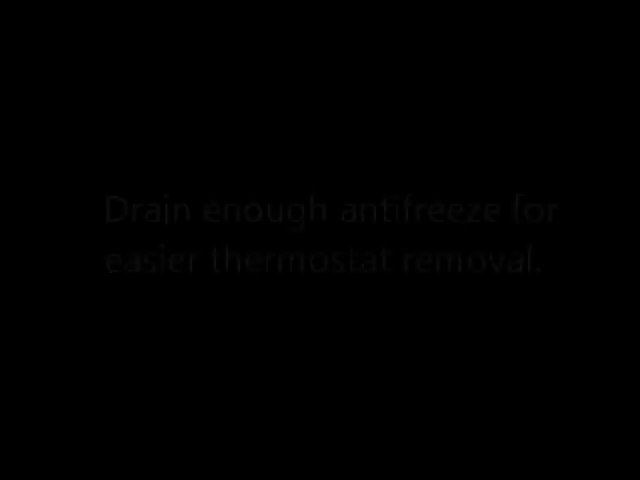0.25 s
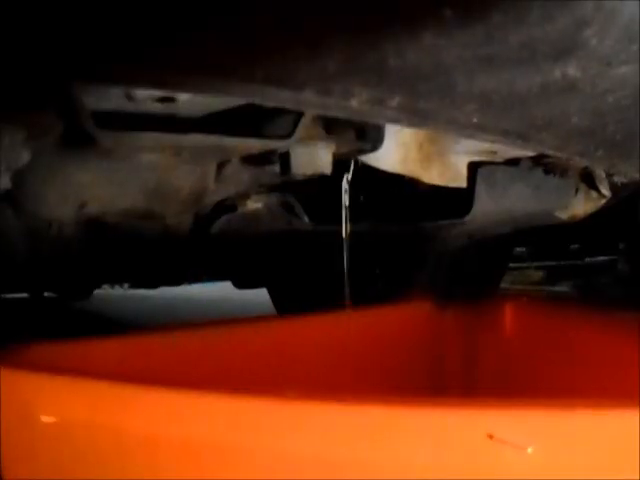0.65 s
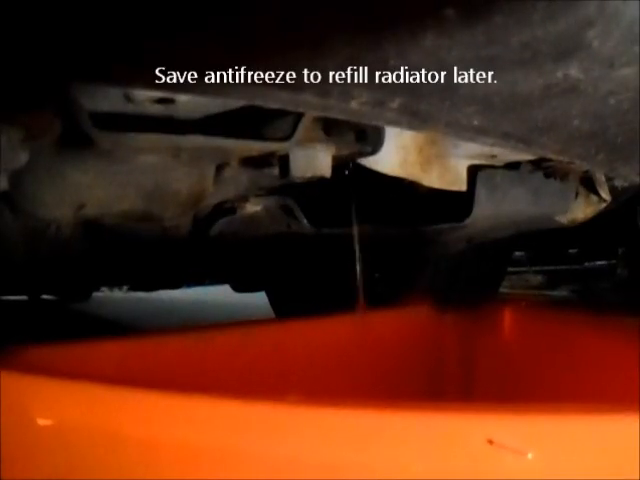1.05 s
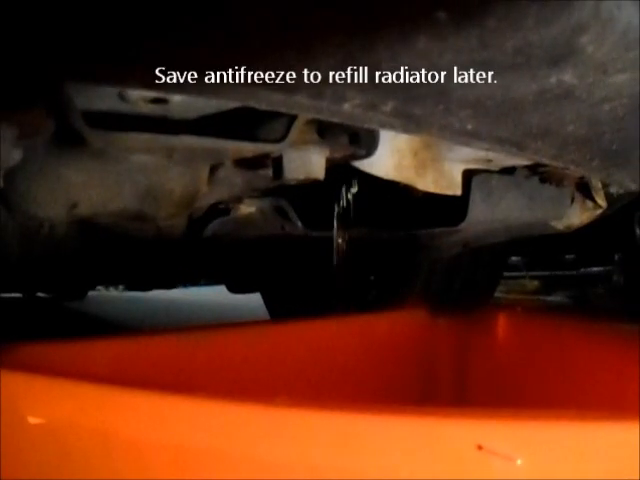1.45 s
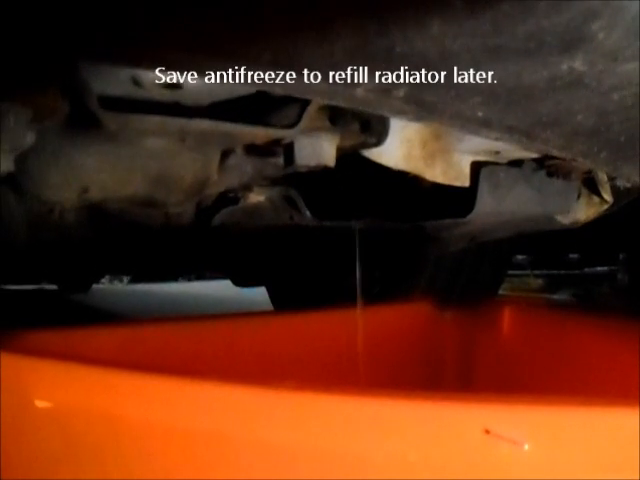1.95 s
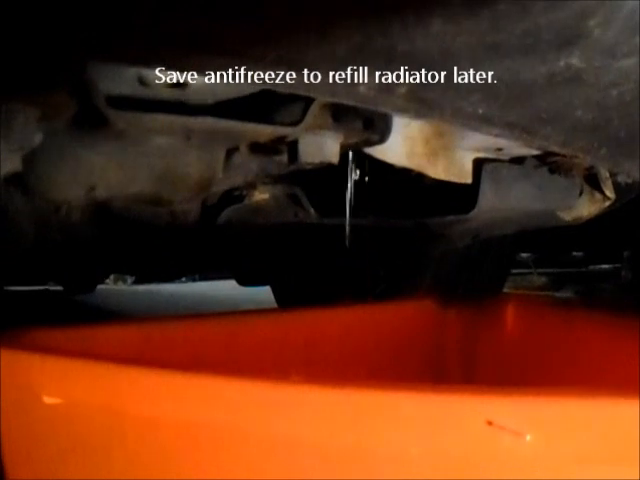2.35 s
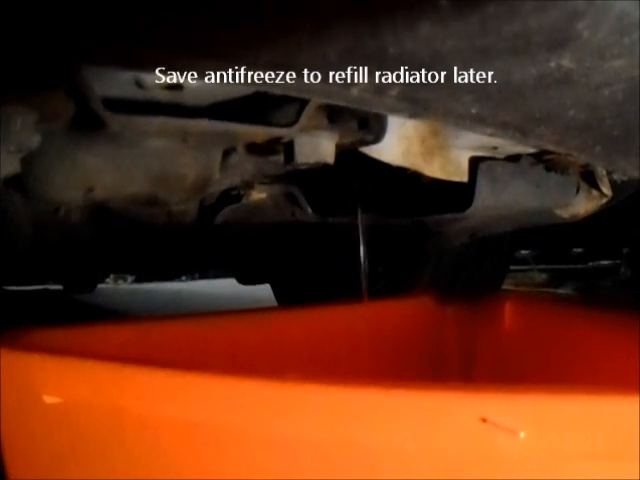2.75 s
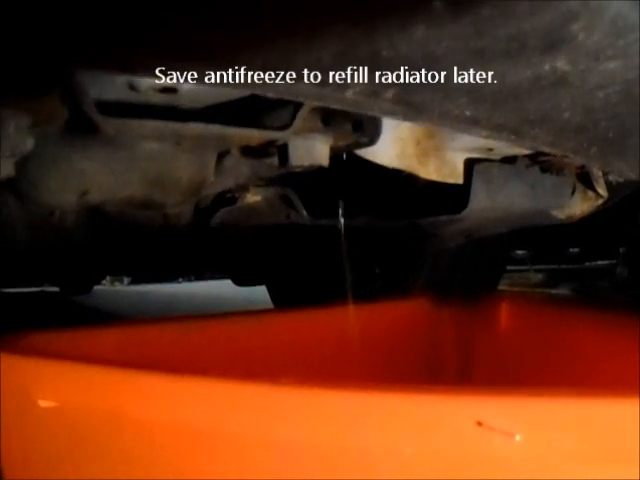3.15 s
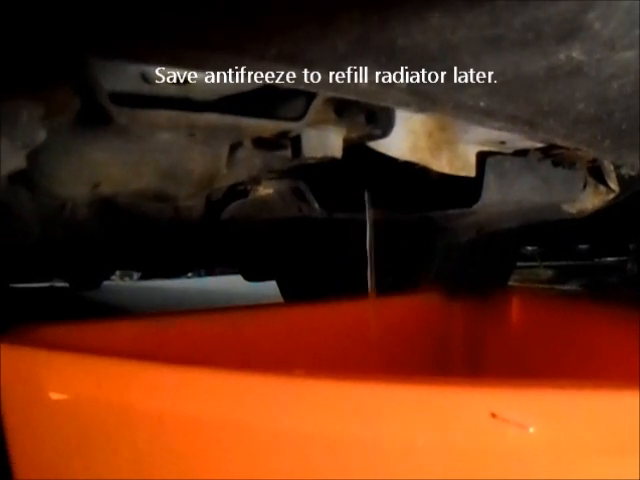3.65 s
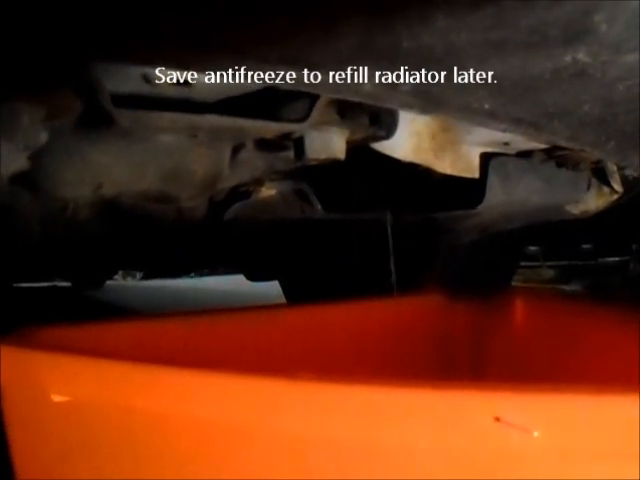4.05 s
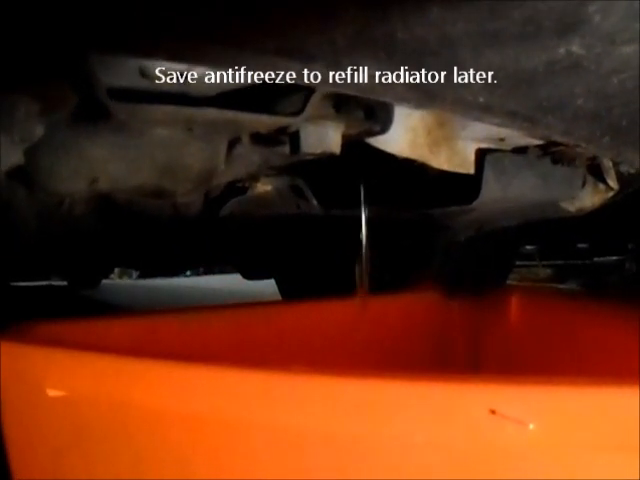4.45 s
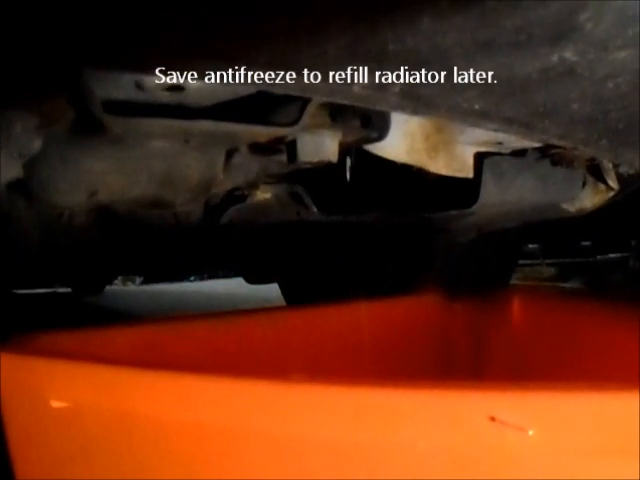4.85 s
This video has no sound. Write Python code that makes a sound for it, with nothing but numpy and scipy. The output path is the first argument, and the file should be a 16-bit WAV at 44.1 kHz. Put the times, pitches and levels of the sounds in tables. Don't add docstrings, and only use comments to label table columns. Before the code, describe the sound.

A loud click opens the sound, then coolant drops tap and plink quickly into a plastic drain pan beneath a car, dull and close.

```python
import sys
import numpy as np
from scipy import signal
from scipy.fft import rfft, irfft
from scipy.io import wavfile
from scipy.ndimage import uniform_filter1d

SR = 44100
rng = np.random.default_rng(int(sys.argv[2]) if len(sys.argv) > 2 else 0)


def generate_wav(sig):
    pcm = np.round(np.clip(np.atleast_2d(sig).T, -1, 1) * 32767).astype(np.int16)
    wavfile.write(sys.argv[1], SR, pcm)


def voltage_ratio(decibels):
    exponent = np.asarray(decibels, float) / 20
    return 10 ** exponent


N = 225510
ON_S = 0.388231

# f/Hz, density/dB
GARAGE_SPECTRUM = [(12, -45), (20, -3.5), (70, 5), (243, -2), (331, -2), (582, -16), (810, -15),
                   (1130, -14.5), (1330, -21.5), (1610, -20), (1890, -24), (4860, -27), (5600, -31.5),
                   (7280, -75.5), (12300, -120)]
# t/s, level/dB
TRAFFIC_LEVEL = [(.45, -49), (.9, -53), (1.3, -41.5), (1.7, -52), (2.0, -46), (2.4, -50), (2.55, -45),
                 (3.1, -44.5), (3.4, -52), (3.7, -47), (4.3, -55), (4.6, -44), (5.1, -54)]
# f/Hz, level/dB, t60/s, polarity at microphone/+-1
PAN_MODES = [(321, -10.3, 0.058, -1), (329, -11.1, 0.15, 1), (427, -10.2, 0.048, 1),
             (469, -14.7, 0.062, -1), (539, -20.2, 0.124, 1), (631, -15.5, 0.046, 1), (687, -22.8, 0.09, 1),
             (763, -9.4, 0.054, 1), (825, 0.0, 0.025, -1), (919, -6.4, 0.024, -1), (1044, -13.2, 0.051, 1),
             (1134, -26.6, 0.071, -1), (1300, -14.5, 0.039, -1), (1450, -10.4, 0.014, 1),
             (1776, -11.8, 0.016, 1), (1910, -16.3, 0.044, -1), (2095, -15.4, 0.027, -1),
             (2242, -13.4, 0.013, 1), (2334, -25.2, 0.035, 1), (2561, -14.0, 0.015, 1),
             (2769, -20.9, 0.013, 1), (3004, -21.6, 0.018, -1), (3262, -27.0, 0.026, -1),
             (3437, -20.8, 0.02, -1), (3790, -34.7, 0.042, -1), (4011, -38.5, 0.035, -1),
             (4400, -41.6, 0.035, -1), (4741, -43.8, 0.05, 1), (5072, -40.3, 0.058, 1)]
# t/s, share/0-1 (clipped)
STREAM_ASIDE = [(.4, -0.83), (1.5, 0.27), (2.5, -0.13), (3.6, 0.25), (3.85, 0.15), (4.3, 2), (4.55, -0.9),
                (5.1, -4)]
# f/Hz, level/dB
RIM_COLOUR = [(330, -1.5), (550, 5.5), (700, 1.5), (900, -2), (1400, -5), (2100, -0.5), (3000, -3.5),
              (4500, -0.5)]
# t/s, level/dB, hardness/dB per octave
LARGE_DROPS = [(.608, -21, 2.5), (0.8395, -32.5, -.5), (0.9213, -29, -1.5), (.9788, -30, 2), (.9909, -30, 3.5),
               (1.0995, -27.5, -1), (1.1084, -24.5, 2.5), (1.166, -31.5, -2.5), (1.201, -26.5, 0),
               (1.2142, -31.5, -2.5), (1.3801, -22, 1.5), (1.6057, -29.5, 1), (1.6401, -31.5, -0.5),
               (1.6475, -32, 1), (1.982, -31, -1), (2.0573, -18, 4), (2.0923, -31, -1.5), (2.2487, -32, 1),
               (2.2905, -30, -0.5), (2.8394, -30.5, -3.5), (3.4174, -32, -3), (3.4625, -28, 5.5),
               (3.5885, -30, 2), (3.7418, -28.5, -1), (3.7944, -29.5, -1), (3.8071, -31, 2.5),
               (3.9807, -28.5, -1), (4.3056, -25.5, 3.5), (4.596, -28, -1.5), (4.6914, -24.5, 2.5),
               (.397, -33.5, -1), (0.425, -32, -1), (.7135, -32.5, -0.5), (0.8582, -34, 0.5),
              (1.077, -34, 0), (1.1282, -33, 1.5), (1.3043, -33.5, 0), (1.354, -33.5, -2), (1.4135, -34, 2),
              (1.4892, -33.5, -3), (1.709, -32.5, 0.5), (1.9616, -32.5, -2.5), (2.3701, -33.5, -4.5),
              (2.3807, -35, -8), (2.428, -33, -1.5), (2.5172, -33.5, -.5), (2.5704, -34, 0),
              (2.8222, -33.5, -1.5), (2.918, -32.5, -1), (3.1595, -32.5, -0.5), (3.5082, -34.5, -1.5),
              (3.7648, -36, -6), (3.8523, -32.5, 3), (3.9647, -33.5, 1.5), (4.0196, -33, 3.5),
              (4.0599, -33, -0.5), (4.0678, -31.5, -2), (4.7978, -36, 2), (4.857, -33.5, 2.5),
              (5.0782, -36, -1)]
# t/s, level/dB, hardness/dB per octave
SMALL_DROPS = [(0.4183, -35.5, -4.5), (0.679, -36.5, 1), (.7362, -39.5, 1.5), (0.7435, -35.5, -1),
               (.7577, -37, 2), (0.7975, -35.5, 2), (.8295, -35, 1.5), (1.0673, -36, -1),
               (1.2307, -36.5, -0.5), (1.3216, -35.5, -5), (1.3306, -35.5, 0.5), (1.3634, -38, -6),
               (1.4338, -40.5, 0), (1.777, -35, 4), (3.086, -37, -.5), (3.138, -37, -2), (3.1851, -36, -1),
               (3.2309, -36.5, 0), (3.259, -35.5, -0.5), (3.2896, -36.5, -0.5), (3.4011, -35.5, -3.5),
               (3.7011, -35, 0), (3.7512, -41, -6), (3.87, -34, -1), (4.0122, -33.5, 2.5),
               (4.3722, -34.5, 1), (4.4085, -34.5, 1), (4.5215, -37.5, -1.5), (4.9355, -38.5, -3.5),
               (4.9706, -36.5, 1.5),
               (0.4577, -39.5, 0), (0.5465, -36, -1), (0.5915, -40, 2), (0.8237, -41, 3), (1.2546, -42, 2.5),
         (1.788, -34, 3), (1.8607, -38, 1.5), (1.9428, -43, 1), (2.1424, -40, 0), (2.544, -38, 0),
         (2.5962, -37, 1), (2.6373, -38, 1.5), (2.6991, -40.5, 4), (2.713, -37.5, -3), (2.8808, -36.5, -1),
         (2.909, -37.5, 3.5), (2.9234, -45, 9.5), (2.9667, -39.5, 2), (3.3683, -36.5, -1.5),
         (3.5575, -37.5, 2), (3.7203, -38.5, -3), (4.088, -37, 1.5), (4.2822, -41, .5), (4.3155, -37, 0),
         (4.4427, -38.5, 1.5), (4.5333, -38.5, -3), (4.6311, -43.5, 5.5), (4.664, -36.5, 1.5),
         (4.9209, -37, 0), (5.1049, -39, 1.5)]
# t/s, level/dB
SPECKS = [(0.411, -45), (.4712, -42), (.504, -42.5), (0.6999, -40), (.8106, -39), (.9029, -46),
          (.9444, -41), (1.189, -41.5), (1.443, -37.5), (1.5119, -41.5), (1.7527, -42), (1.9157, -38.5),
          (2.1075, -40), (2.6577, -38), (2.7053, -41.5), (2.7727, -44), (3.2407, -35.5), (3.3038, -42),
          (3.3179, -43), (3.3586, -43), (3.6789, -39), (3.953, -38), (4.1012, -41.5), (4.2559, -41.5),
          (4.2714, -44), (4.387, -37), (4.7255, -40), (4.8457, -41), (4.9506, -42), (4.993, -39.5)]
# t/s, level/dB
SPRAY_FLOW = [(.47, -50.5), (.53, -67), (.56, -50), (1.0, -50), (1.04, -61.5), (1.42, -44), (1.56, -64),
              (1.8, -48), (1.97, -47), (2.2, -61), (2.4, -46), (2.5, -69), (2.8, -45), (3.05, -65),
              (3.32, -47.5), (4.04, -50.5), (4.18, -43), (4.4, -49)]
# f/Hz, width/Hz, level re drop/dB, t60/s
SPLASH_BANDS = [
    (2590, 2440, -22, 0.035),
    (4300, 1300, -29.5, 0.023),
]
# t/s, peak/dB, f/Hz, rise/share per 10 ms, life until burst/s
SINGING_BUBBLES = [(0.694, -42, 1280, .01, 0.01), (1.2049, -28, 1477, 0.025, .009),
                   (1.2152, -39, 1433, -.04, 0.013), (1.4732, -28.5, 1424, 0.045, 0.015),
                   (1.819, -38.5, 2010, 0.012, .0066), (2.4048, -25, 1503, -0.0011, .014),
                   (2.6642, -27, 1315, 0.038, .022), (2.9894, -29, 1700, -0.0038, .006),
                   (3, -39.5, 1500, 0.0042, .006), (3.008, -47, 1743, .003, .06),
                   (4.6875, -33.5, 2018, 0.017, 0.01), (4.955, -27, 1522, -0.011, 0.015)]
# t/s, peak/dB, f/Hz, fade by 60 dB/cycles
TICKING_BUBBLES = [(.4357, -31, 3970, 63), (.645, -49.5, 4300, 30), (1.815, -31, 2300, 9),
                   (2.04, -55, 2430, 32), (2.1205, -39, 5300, 43), (2.865, -40, 4560, 42),
                   (2.862, -42.5, 3490, 30), (2.856, -46.5, 5070, 31), (3.569, -40, 3000, 43),
                   (4.0575, -44, 4700, 28), (4.123, -39, 4920, 34), (4.338, -45, 4870, 33),
                   (4.4205, -30, 3800, 12), (4.4265, -53, 3550, 46), (4.6835, -31, 2300, 8)]
# f/Hz, width/Hz, level/dB, t60/s
UNDERBODY_BANDS = [
    (930, 1220, -4, 0.079),
    (2300, 1200, 0, 0.056),
    (4230, 2600, 0, 0.03),
]


def band(x, hz, width_hz):
    edges_hz = np.clip([hz - width_hz / 2, hz + width_hz / 2], 20, SR / 2.2)
    return signal.sosfilt(signal.butter(2, edges_hz, "band", fs=SR, output="sos"), x)


def over_log_hz(hz, table):
    table_hz, table_db = np.transpose(table)
    return np.interp(np.log(hz), np.log(table_hz), table_db)


def fade60(t_s, t60_s):
    return np.exp(-np.log(1000) * t_s / t60_s)


def wander(samples):
    drift = uniform_filter1d(uniform_filter1d(rng.standard_normal(N), samples), samples)
    return drift / drift.std()


def train(s, gain):
    return np.bincount(np.clip((s * SR).round().astype(int), 0, N - 1), gain, N)


def ring(kick, hz, t60_s):
    pole = np.exp(2j * np.pi * hz / SR) * fade60(1 / SR, t60_s)
    return signal.lfilter([0, pole.imag], [1, -2 * pole.real, abs(pole) ** 2], kick)


def switch_on(dry):
    pop_level, pop_samples = 0.86, 12.5
    settle_level, settle_s = -0.0115, 0.21
    since = np.arange(N) - round(ON_S * SR)
    pop = pop_level * (since >= 0) * np.clip(pop_samples - since, 0, 1)
    settling = settle_level * np.exp(-since / SR / settle_s)
    return (dry + settling) * (since > pop_samples) + pop


def garage():
    level_db, swell_db = -48.5, 1.5
    hz = np.maximum(np.arange(N // 2 + 1) * SR / N, 1)
    colour = voltage_ratio(over_log_hz(hz, GARAGE_SPECTRUM))
    noise = irfft(rfft(rng.standard_normal(N)) * colour, N)
    return noise / noise.std() * voltage_ratio(level_db + swell_db * wander(3000))


def traffic():
    level_db, lump_db = -5.5, 1.5
    rumble = band(rng.standard_normal(N), 75.2, 44)
    passing_db = np.interp(np.arange(N) / SR, *np.transpose(TRAFFIC_LEVEL))
    return rumble / rumble.std() * voltage_ratio(passing_db + level_db + lump_db * wander(2500))


def counted_drops():
    large = np.array(LARGE_DROPS).T
    small = np.array(SMALL_DROPS).T
    specks = np.array(SPECKS).T
    speck_hard_db = 1.1 * rng.standard_normal(specks.shape[1])
    lag, size, hardness = rng.random((large.shape[1], 3)).T
    satellite_s = large[0] + 0.0065 + 0.012 * lag
    satellite_db = -47.5 + 4.5 * (2 * size - 1)
    satellites = [satellite_s, satellite_db, 6 * hardness - 3]
    return np.hstack([large, small, np.vstack([specks, speck_hard_db]), satellites])


def spray(drop_s):
    rate_hz, level_db, spread_db = 420, -4.5, 2.5
    thins_db_per_s, thinnest_db = 148.5, -7.5
    hard_db, hard_range_db = -0.5, 3
    when, size, hardness = rng.random((int(rate_hz * N / SR), 3)).T
    s = when * N / SR
    drop_s = np.sort(drop_s)
    since_s = s - drop_s[np.clip(np.searchsorted(drop_s, s) - 1, 0, None)]
    thin_db = np.clip(-thins_db_per_s * since_s, thinnest_db, 0)
    flow_db = np.interp(s, *np.transpose(SPRAY_FLOW))
    size_db = flow_db + thin_db + level_db - spread_db * np.log(1 - size)
    return s, size_db, hard_db + hard_range_db * (2 * hardness - 1)


def patter(s, db, hard_db):
    spot_scatter_db = 1.77
    aside = np.clip(np.interp(s, *np.transpose(STREAM_ASIDE)), 0, 1)
    out = 0
    for hz, mode_db, t60_s, side in PAN_MODES:
        rim_db = aside * over_log_hz(hz, RIM_COLOUR)
        spot_db = spot_scatter_db * rng.standard_normal(len(s))
        kick = train(s, voltage_ratio(db + mode_db + rim_db + spot_db + hard_db * np.log2(hz / 900)))
        out = out + side * ring(kick, hz, t60_s)
    return out


def splash(s, db, hard_db):
    out = 0
    for hz, width_hz, under_db, t60_s in SPLASH_BANDS:
        kick = train(s, voltage_ratio(db + under_db + hard_db * np.log2(hz / 900)))
        fade = signal.lfilter([1], [1, -fade60(1 / SR, t60_s)], kick)
        hiss = band(rng.standard_normal(N), hz, width_hz)
        out = out + fade * hiss / hiss.std()
    return out


def trapped_bubbles():
    plink_cycles = 160
    remnant_db, remnant_life_s = -20, 0.04
    tick_sag, tick_life_s = -0.034, 0.015
    found = []
    for s, db, hz, rise, life_s in SINGING_BUBBLES:
        t60_s = plink_cycles / hz
        found.append((s, db, hz, t60_s, rise, life_s))
        found.append((s + life_s, db + remnant_db, hz * (1 + rise), t60_s, 0, remnant_life_s))
    for s, db, hz, cycles in TICKING_BUBBLES:
        found.append((s, db, hz, cycles / hz, tick_sag, tick_life_s))
    return found


def bubbles():
    direct_db, attack_cycles, burst_s = 5.5, 0.48, 0.0021
    t = np.arange(6000) / SR
    out = np.zeros(N + len(t))
    for s, db, hz, t60_s, rise, life_s in trapped_bubbles():
        fade = fade60(t, t60_s) * np.exp(-np.maximum(t - life_s, 0) / burst_s)
        attack = 1 - np.exp(-t * hz / attack_cycles)
        glide = 1 + 50 * rise * t
        tone = np.sin(2 * np.pi * hz * t * glide) * fade * attack
        coloured = 0
        for mode_hz, mode_db, mode_t60_s, side in PAN_MODES:
            coloured = coloured + side * voltage_ratio(mode_db) * ring(tone, mode_hz, mode_t60_s)
        heard = coloured / abs(coloured).max() + voltage_ratio(direct_db) * tone
        start = int(s * SR)
        out[start:start + len(t)] += voltage_ratio(db) * heard / abs(heard).max()
    return out[:N]


def underbody(x):
    level_db, first_echo_s = 0.5, 0.002
    t = np.arange(8000) / SR
    scatter = rng.standard_normal(len(t)) * rng.random(len(t)) ** 2 * (t > first_echo_s)
    echoes = 0
    for hz, width_hz, db, t60_s in UNDERBODY_BANDS:
        tail = scatter * fade60(t, t60_s)
        echoes = echoes + voltage_ratio(db) * band(tail / np.linalg.norm(tail), hz, width_hz)
    return voltage_ratio(level_db) * signal.fftconvolve(x, echoes)[:N]


def low_rate(live):
    top_hz, leak_db, pop_leak_db = 5310, -42, -20
    guarded = signal.sosfilt(signal.butter(2, 7500, fs=SR, output="sos"), live)
    taps = signal.firwin(129, top_hz, window=("kaiser", 5.0), fs=SR)
    padded = np.pad(guarded, ((0, 0), (64, 64)), "reflect")
    narrow = signal.fftconvolve(padded, taps[None], "valid")
    near_pop = abs(np.arange(N) - round(ON_S * SR)) < 40
    return narrow + voltage_ratio(np.where(near_pop, pop_leak_db, leak_db)) * guarded


def scene():
    drop_echo_db = -8.5
    counted = counted_drops()
    hits = [np.concatenate(pair) for pair in zip(counted, spray(counted[0]))]
    drops = patter(*hits) + splash(*hits)
    plinks = bubbles()
    echoes = underbody(plinks + voltage_ratio(drop_echo_db) * drops)
    return (drops + plinks + echoes + garage() + traffic())[None]


def roll_off(x):
    return signal.sosfilt(signal.butter(12, 15700, fs=SR, output="sos"), x)


def record(dry):
    mix = low_rate(switch_on(dry))
    return roll_off(mix)


dry = scene()
out = record(dry)
generate_wav(out)
```